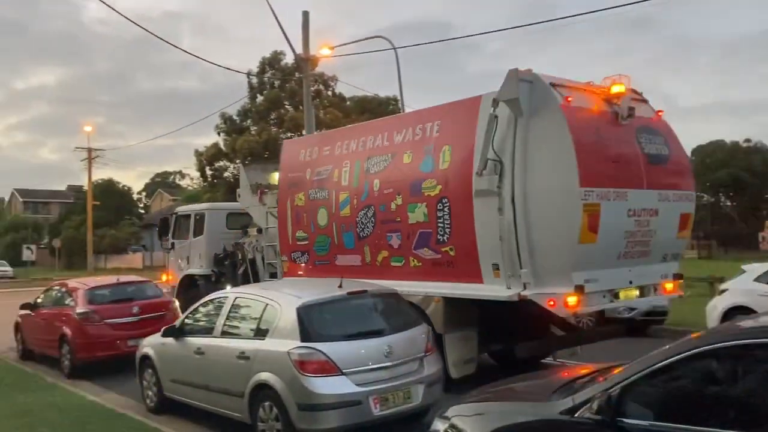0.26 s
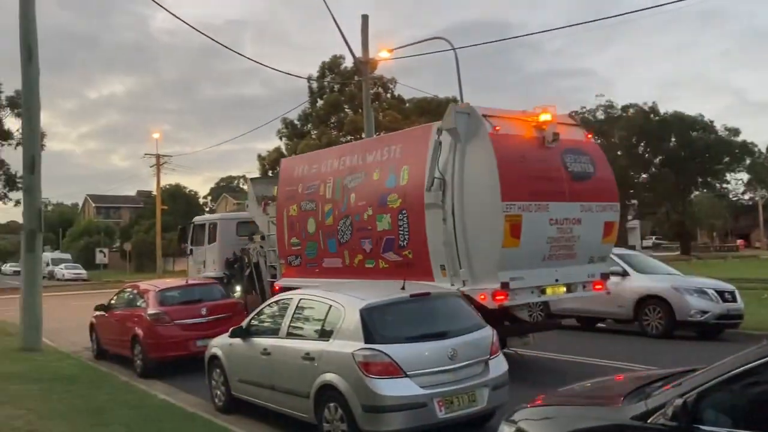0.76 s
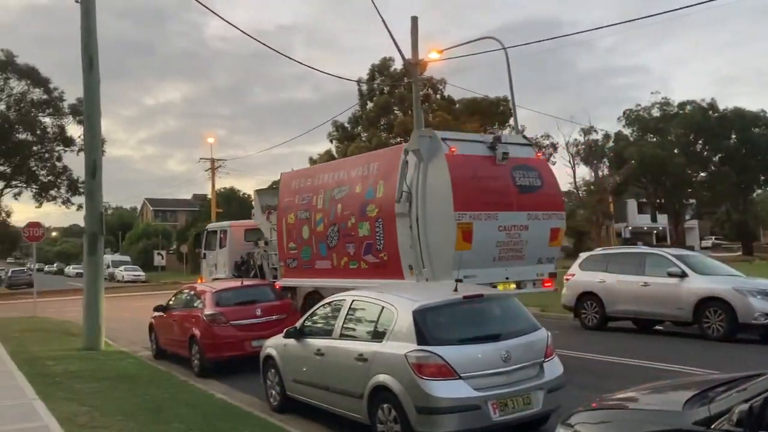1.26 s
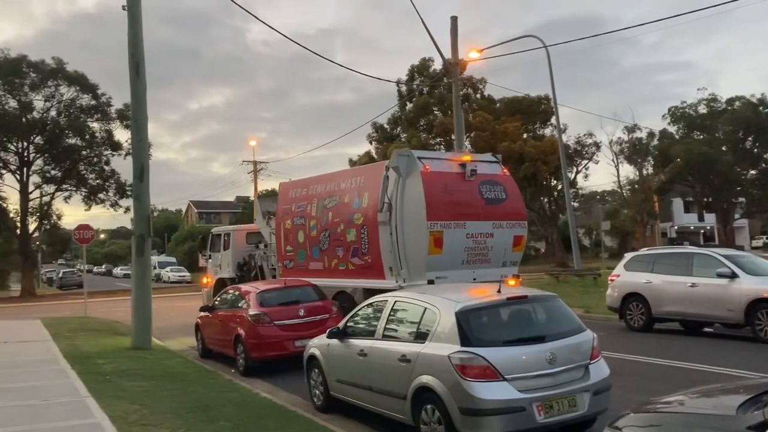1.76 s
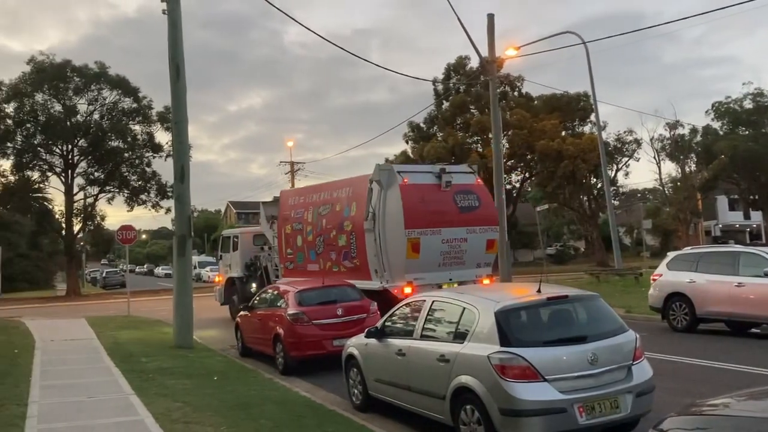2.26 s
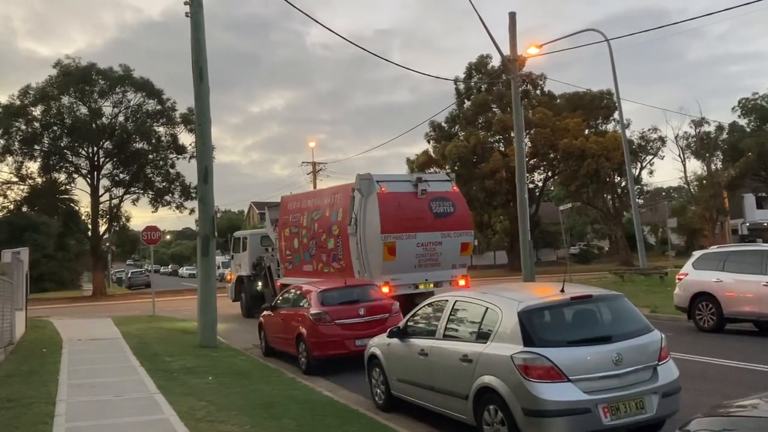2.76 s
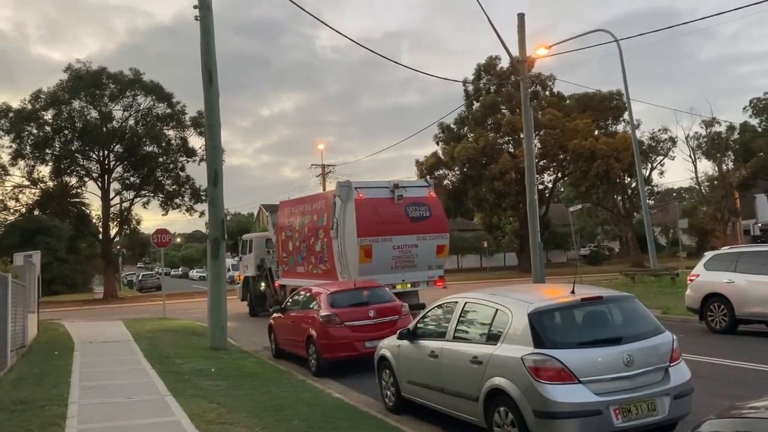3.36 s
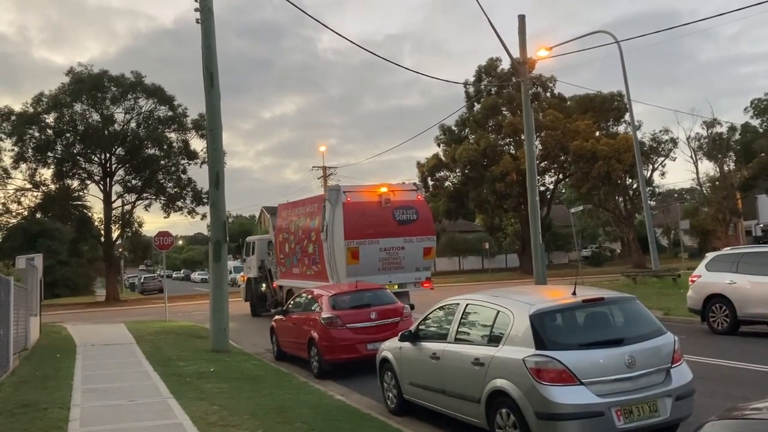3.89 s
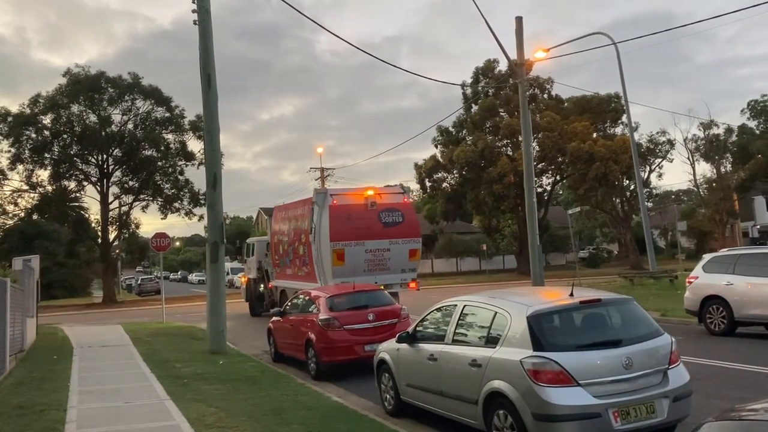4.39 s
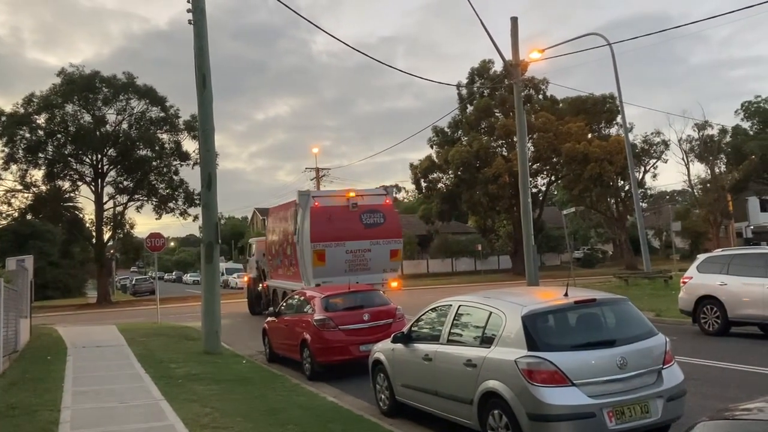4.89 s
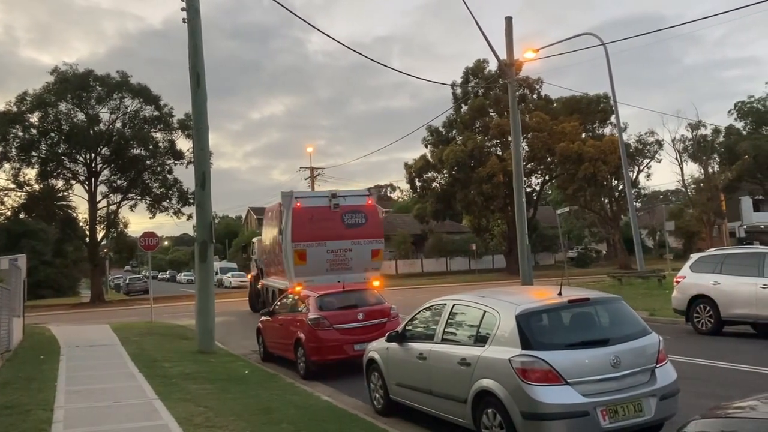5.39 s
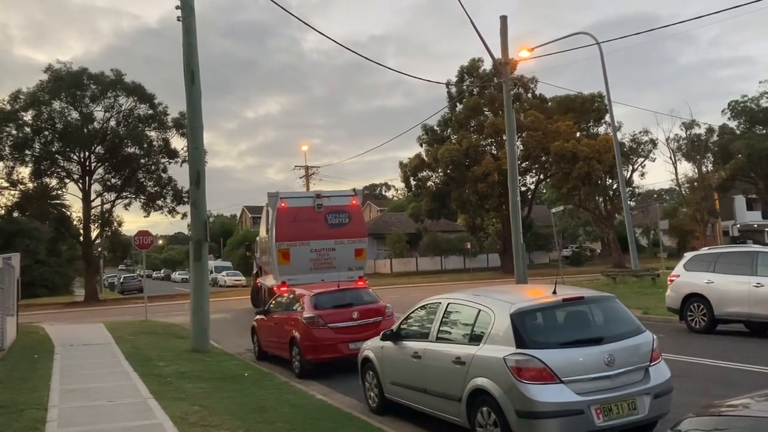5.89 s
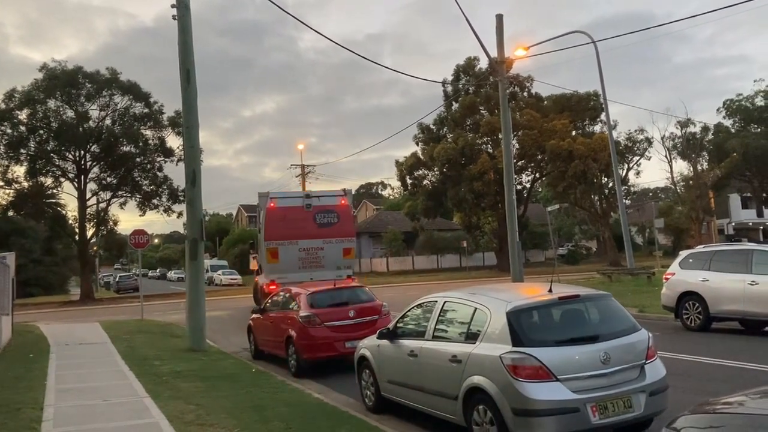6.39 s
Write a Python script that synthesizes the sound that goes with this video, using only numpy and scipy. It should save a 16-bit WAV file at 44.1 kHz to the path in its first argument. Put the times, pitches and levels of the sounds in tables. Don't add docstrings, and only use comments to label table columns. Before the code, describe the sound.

Outdoors on a suburban street, a heavy diesel refuse truck moves away from a stationary stereo microphone. Its droning exhaust drops in pitch as it slows, with metallic rattles and low brake moans. At near standstill the brakes squeal thin and high, unevenly, over a low idle. The engine then revs up and pulls away, later falling back to a softer low chug.

```python
import sys
import numpy as np
from scipy import signal
from scipy.fft import rfft, irfft, next_fast_len
from scipy.io import wavfile

SR = 44100
rng = np.random.default_rng(int(sys.argv[2]) if len(sys.argv) > 2 else 0)


def wrap_up_sound(samples):
    columns = np.atleast_2d(samples).T
    tamed = np.clip(columns, -1, 1)
    steps = np.round(tamed * 32767).astype(np.int16)
    wavfile.write(sys.argv[1], SR, steps)


def field_ratio(decibels):
    return 10 ** (np.asarray(decibels, dtype=float) / 20)


N = 292812
TIME = np.arange(N) / SR
SIZE = next_fast_len(N + 8192)
BINS = np.fft.rfftfreq(SIZE, 1 / SR)

# t/s, f/Hz
FIRING_RATE = [(0, 83.2), (.28, 81.46), (.5, 72), (.68, 63.96), (1.13, 59.3), (1.42, 53.16), (1.68, 31.95),
               (3.6, 32.59), (3.75, 42.2), (3.96, 50.22), (4.4, 60.17), (4.62, 59.64), (4.85, 52.92),
               (5.4, 57.13), (5.72, 56), (6.0, 32.12), (6.3, 36.16), (6.64, 39.8)]
# t/s, level/dB
LOAD = [(0, -18.5), (.3, -20), (.65, -16.5), (1.0, -18), (1.3, -23.5), (1.45, -39), (1.87, -31.5),
        (2.35, -33.5), (3.65, -33), (3.77, -23.5), (3.9, -19), (4.45, -21), (4.95, -22), (5.45, -25.5),
        (5.8, -26), (5.92, -37.5), (6.4, -40), (6.64, -24)]
# t/s, level/dB, half length/s
THROTTLE_LIFTS = [(.14, -11, 0.073), (.51, -4.5, 0.041), (1.6, -13, 0.063), (2.02, -9, 0.057),
                  (2.27, -7, 0.058), (4.22, -2.5, 0.12), (4.79, -5.5, 0.089)]
# t/s, distance/m
DISTANCE = [(0, 7.55), (.5, 10.7), (1.2, 12.1), (2.2, 15.7), (3.4, 18.3), (4.5, 18.4), (6.64, 21.25)]
# f/Hz, level/dB
PIPE = [(32, -14), (46, -0.5), (62, 0.5), (82, -4), (108, -20), (140, -21), (172, -13), (250, -24)]
ORDER_SWAY_DB = [.7, 1.2, 1.5]
OVERRUN_DB = [0, 1.5, -10.5]
# order/firing rate, level re rumble/dB
UNEVEN_ORDERS = [(4 / 3, -37), (1.5, -9.5), (5 / 3, -8.5), (2.5, -3), (3.5, -5.5), (4, -11.5), (4.5, -18.5),
                 (5, -12.5), (6, -8), (6.5, -13), (7, -13), (13, -12), (14, -13)]
# level near and cruising/dB, speed share/(dB/dB), load share/(dB/dB), air loss/(dB/m)
LAYERS = [
    (-33, 0.94, 0.043, 0.1),
    (-37.5, 0.86, 0.085, -0.09),
    (-43.5, 0.9, 0.22, -0.03),
    (-48, 0.72, 0.3, 0.37),
]
# f/Hz, density/dB
RUMBLE = [(20, -27), (35, -35), (55, 7), (90, 5.5), (120, 8), (200, -1), (320, -1), (450, -3.5),
          (600, -14.5), (900, -29), (3000, -78)]
# f/Hz, density/dB
CLATTER = [(350, -51), (600, -0.5), (900, -1), (1400, -4), (2200, -9), (3000, -11.5), (4500, -18.5),
           (7000, -78), (12000, -70)]
# f/Hz, density/dB
HISS = [(2000, -12), (4000, 1.5), (6000, -2), (8000, -2.5), (10000, -7), (12000, -41), (15000, -60)]
# f/Hz, density/dB
FIZZ = [(7000, -20), (9000, -1.5), (10500, 0), (12000, -3), (13200, -8), (14300, -14), (14900, -20),
        (15300, -27), (16000, -30)]
# f/Hz, width/Hz, level/dB
PANELS = [(250, 9.3, 4.5), (323, 10.5, 3.5), (393, 12, 3), (800, 75, 3.5), (1041, 17, 7), (1600, 95, 3),
          (2070, 21, 6), (2278, 89, 8), (2560, 53, 6.5), (3427, 19, 9.5), (4300, 19, 11), (4960, 37, 7),
          (5920, 45, 4.5), (6960, 52, 6)]
# t/s, f/Hz, level/dB
TURBINE = [(0, 15500, -47), (.25, 15100, -49), (.45, 14000, -54), (.7, 12680, -50), (1.0, 11900, -55),
           (1.4, 10400, -56), (2.0, 7660, -67), (2.3, 7180, -85), (3.7, 5800, -85), (4.0, 6296, -53),
           (4.4, 7094, -64), (5.7, 8404, -87), (5.95, 8020, -85)]
# t/s, f/Hz, level/dB
DRUM = [(2.38, 8340, -73), (2.44, 8360, -49), (2.6, 8395, -53), (2.7, 8310, -43.5), (2.83, 8190, -53.5),
        (2.98, 8310, -51.5), (3.15, 8500, -47), (3.28, 8410, -49), (3.58, 8500, -72)]
# t/s, level/dB, half length/s
GRABS = [(2.517, 11, .04), (2.593, 11, .02), (2.69, 7.5, .04), (2.956, 10.5, .015), (3.004, 10.5, 0.011),
         (3.067, 4.5, 0.056), (3.183, 9, .025)]
# start/s, loudest/s, end/s, f/Hz, level/dB
SQUEALS = [(2.39, 2.596, 2.81, 11060, -38), (2.42, 2.45, 2.52, 11070, -47), (2.92, 2.96, 3.05, 10700, -47),
           (3.28, 3.338, 3.53, 10680, -43), (2.5, 2.54, 2.64, 11950, -47), (3.13, 3.186, 3.27, 11760, -55),
           (2.43, 2.538, 2.6, 14500, -46), (2.58, 2.698, 2.82, 14400, -42), (2.96, 3.02, 3.12, 13900, -49),
           (3.04, 3.12, 3.26, 13920, -44)]
# start/s, length/s, start f/Hz, end f/Hz, level/dB
MOANS = [
    (.5, 0.55, 835, 820, -38.5),
    (1.206, 0.24, 767, 700, -37.5),
    (2.288, 0.33, 689, 660, -44.5),
]
# t/s, level/dB, centre f/Hz, width/Hz, spread/s
RATTLES = [(0.214, -23.5, 393, 500, 0.024), (.2, -27.5, 197, 60, 0.078), (.97, -28, 125, 40, 0.066),
           (.217, -30.5, 960, 300, 0.027), (.249, -28, 1010, 400, 0.0057), (.27, -31.5, 520, 596, 0.16),
           (.98, -26, 1700, 2187, 0.019), (.983, -31, 710, 800, 0.083), (0.984, -33.5, 3360, 2980, 0.028),
           (1.005, -29.5, 1540, 1600, 0.033), (1.099, -37, 7150, 2200, 0.021),
           (1.111, -29.5, 3200, 3560, 0.025), (1.925, -46, 2965, 4030, 0.018),
           (2.404, -34.5, 187, 250, 0.032), (2.437, -31.5, 835, 1100, 0.0016), (2.46, -47.5, 600, 800, 0.1)]
# t/s, start f/Hz, end f/Hz, length/s, level/dB
CHIRPS = [
    (1.352, 4300, 4300, 0.023, -38.5),
    (2.202, 4715, 4900, 0.042, -50),
]
# f/Hz, correlation/1
SAME = [(60, 0.94), (150, 0.94), (300, 0.85), (500, 0.71), (950, 0.33), (2000, 0.22), (3500, 0.23),
        (6000, 0.46), (6900, 0.99), (16000, 1)]
# f/Hz, angle/rad
PORT_TURN = [(0, 0), (200, 0.19), (450, -1.3), (1100, -2), (2300, -6), (5600, -16), (6500, -13),
             (13400, -3.5), (13900, -2.3), (15700, 1)]
# f/Hz, left re right/dB
PORT_BALANCE = [(60, -1.5), (400, -2.5), (600, 0.8), (950, 7.5), (1500, 5), (2500, 2), (3600, 1.5),
                (6000, 0.5), (16000, -1.5)]

CRUISE_HZ, CRUISE_DB, NEAR_M = 60, -20, 10
OVERRUN_END_S, UNEVEN_OVERRUN_DB = 1.6, -7
RISE_DB, FALL_DB = -18, -31
BRAKE_PAN_DB = 5
RING_S, RING_PER_SPREAD, LONGEST_RING_S = 0.034, 21, 0.4
EDGE_HZ = 15780


def evened(x):
    return x / np.sqrt(np.mean(x ** 2) + 1e-20)


def read(points, hz):
    f, value = np.transpose(points)
    return np.interp(np.log(hz + 1), np.log(f + 1), value)


def curves(rows, t=TIME):
    s, *columns = np.transpose(rows)
    return [np.interp(t, s, c) for c in columns]


def bumps(rows, t=TIME):
    return sum(db * np.exp(-((t - s) / half_s) ** 2) for s, db, half_s in rows)


def add(mix, s, sound):
    part = mix[:, round(s * SR):][:, :sound.shape[-1]]
    part += sound[..., :part.shape[1]]


def resonate(x, hz, width_hz):
    turn = np.exp(2j * np.pi * np.cumsum(hz * np.ones(x.shape[-1])) / SR)
    r = np.exp(-np.pi * width_hz / SR)
    return 2 * (turn * signal.lfilter([1 - r], [1, -r], x / turn + 1e-18)).real


def wander(hz):
    steps = np.arange(0, N + 128, 64)
    lowpass = signal.butter(2, hz, fs=SR / 64, output="sos")
    slow = signal.sosfilt(lowpass, rng.standard_normal(len(steps)))
    return np.interp(np.arange(N), steps, evened(slow))


def partly_alike(a, b, hz):
    same = np.clip(read(SAME, hz), 0, 1)
    return np.array([a, same * a + np.sqrt(1 - same ** 2) * b])


def exhaust_beat(turns, hz, load_db):
    beat = np.zeros(N)
    overrun = TIME < OVERRUN_END_S
    eased_db = load_db + bumps(THROTTLE_LIFTS)
    for k, sway_db in enumerate(ORDER_SWAY_DB):
        order = k + 1
        db = eased_db + read(PIPE, order * hz) + OVERRUN_DB[k] * overrun + sway_db * wander(13.7)
        beat += np.sqrt(2) * field_ratio(db) * np.sin(2 * np.pi * order * turns + 0.8 * k)
    return beat


def uneven_cylinders(turns, rumble_db):
    lines = np.zeros(N)
    overrun_db = UNEVEN_OVERRUN_DB * (TIME < OVERRUN_END_S)
    for order, db in UNEVEN_ORDERS:
        line_db = rumble_db + db + overrun_db + 3.0 * wander(3.7)
        lines += field_ratio(line_db) * np.sin(2 * np.pi * (order * turns + rng.random()))
    return lines


def engine_noise(spectrum, db, sway_db, sway_hz, gate):
    a, b = rfft(gate * rng.standard_normal((2, N)), SIZE)
    panels_db = sum(top_db / (1 + (2 * (BINS - hz) / width_hz) ** 2) for hz, width_hz, top_db in PANELS)
    pair = partly_alike(a, b, BINS) * field_ratio(read(spectrum, BINS) + panels_db)
    return field_ratio(db + sway_db * wander(sway_hz)) * evened(irfft(pair, SIZE)[:, :N])


def engine():
    (hz,), (load_db,), (metres,) = curves(FIRING_RATE), curves(LOAD), curves(DISTANCE)
    speed_db = 20 * np.log10(hz / CRUISE_HZ)
    far_db = 20 * np.log10(metres / NEAR_M)
    levels_db = []
    for db, by_speed, by_load, air in LAYERS:
        source_db = db + by_speed * speed_db + by_load * (load_db - CRUISE_DB)
        levels_db.append(source_db - far_db - air * (metres - NEAR_M))
    rumble_db, clatter_db, hiss_db, fizz_db = levels_db

    turns = np.cumsum(hz * (1 + 0.00601 * wander(10.1))) / SR
    beat = exhaust_beat(turns, hz, load_db)
    uneven = uneven_cylinders(turns, rumble_db)
    strength = field_ratio(2.9 * rng.standard_normal(1000))[turns.astype(int)]
    puff = strength * np.exp(-(turns % 1) / 0.72)
    rumble = engine_noise(RUMBLE, rumble_db + 5.5, 1.23, 8.6, 1 + 0.35 * puff)
    clatter = engine_noise(CLATTER, clatter_db + 3.0, 0.8, 10.6, 1 + 0.16 * puff)
    hiss = engine_noise(HISS, hiss_db + 4.0, 1.0, 21, 1 + 0.13 * puff)
    fizz = engine_noise(FIZZ, fizz_db + 2.0, 1.4, 26, 1 + 0.16 * puff)
    return beat + uneven + rumble + clatter + hiss + fizz


def turbine():
    hz, db = curves(TURBINE)
    air = rng.standard_normal(N)
    return field_ratio(db) * evened(resonate(resonate(air, hz, 350), hz, 350))


def stick_slip(rows, width_hz, fuzz, lift_db, grabs=()):
    t = np.arange(rows[0][0], rows[-1][0], 1 / SR)
    hz, db = curves(rows, t)
    grip = rng.standard_normal(len(t))
    shaken = evened(resonate(resonate(grip, hz, width_hz), hz, width_hz))
    steady = np.sqrt(2) * np.sin(2 * np.pi * np.cumsum(hz) / SR)
    tone = np.sqrt(1 - fuzz) * steady + np.sqrt(fuzz) * shaken
    return t[0], field_ratio(db + lift_db + bumps(grabs, t)) * tone * signal.windows.tukey(len(t), 0.1)


def squeal(start_s, top_s, end_s, hz, db):
    rows = [(start_s, hz, db + RISE_DB), (top_s, hz, db), (end_s, hz, db + FALL_DB)]
    s, sound = stick_slip(rows, 160, 0.76, 0.7)
    return s, sound * field_ratio(np.array([[0.5], [-0.5]]) * BRAKE_PAN_DB)


def moan(s, length_s, start_hz, end_hz, db):
    rows = [(s, start_hz, 0), (s + length_s, end_hz, 0)]
    swell = [(s + length_s / 2, 8.0, length_s / 3)]
    return stick_slip(rows, 30.0, 0.79, db - 10.5, swell)


def rattle(s, db, hz, width_hz, spread_s):
    t = np.arange(SR // 4) / SR
    t60 = min(RING_S + RING_PER_SPREAD * spread_s, LONGEST_RING_S)
    (left, other), chance = rng.standard_normal((2, len(t))), rng.random(len(t))
    clicks = partly_alike(left, other, hz) * (0.5 + 2.4 * (chance < 800 / SR))
    clicks = clicks + 10.0 * (np.arange(len(t)) == 30)
    knocks = np.minimum(t / 0.0011, 1) * field_ratio(-60 * np.maximum(t - spread_s, 0) / (t60 / 3))
    tail = 0.044 * field_ratio(-60 * t / t60)
    ringing = evened(resonate(resonate(clicks, hz, width_hz), hz, 0.83 * width_hz))
    return s, field_ratio(db) * ringing * (knocks + tail)


def chirp(s, start_hz, end_hz, length_s, db):
    count = round(length_s * SR)
    turns = np.cumsum(np.linspace(start_hz, end_hz, count)) / SR
    return s, field_ratio(db) * np.sin(2 * np.pi * turns) * np.hanning(count)


def scene():
    mix = engine() + turbine()
    add(mix, *stick_slip(DRUM, 135, 0.34, 8.6, GRABS))
    for source, table in [(squeal, SQUEALS), (moan, MOANS), (rattle, RATTLES), (chirp, CHIRPS)]:
        for row in table:
            add(mix, *source(*row))
    return mix


def top_cut(x):
    return signal.sosfilt(signal.butter(12, 17010, fs=SR, output="sos"), x)


def record(dry):
    turn = np.exp(1j * np.interp(BINS, *np.transpose(PORT_TURN)))
    half_db = read(PORT_BALANCE, BINS) / 2
    response = np.array([field_ratio(half_db), turn * field_ratio(-half_db)]) * (BINS < EDGE_HZ)
    mix = irfft(rfft(dry, SIZE) * response, SIZE)[:, :N]
    return top_cut(mix)


dry = scene()
out = record(dry)
wrap_up_sound(out)
```